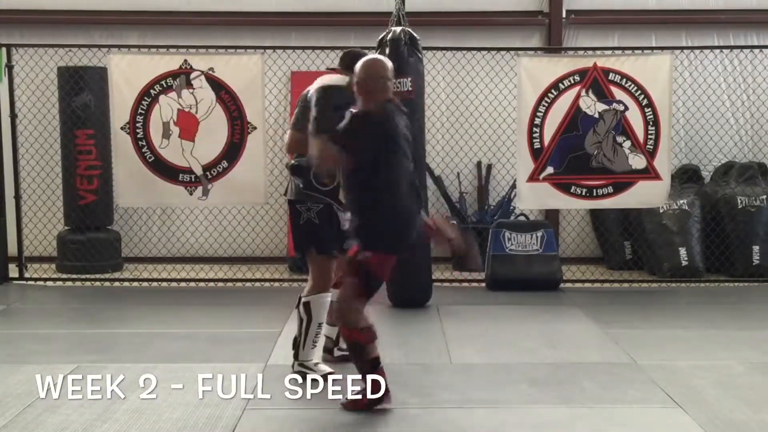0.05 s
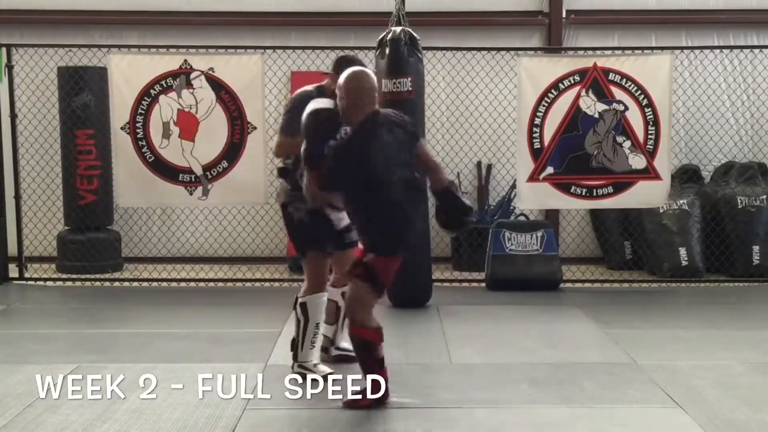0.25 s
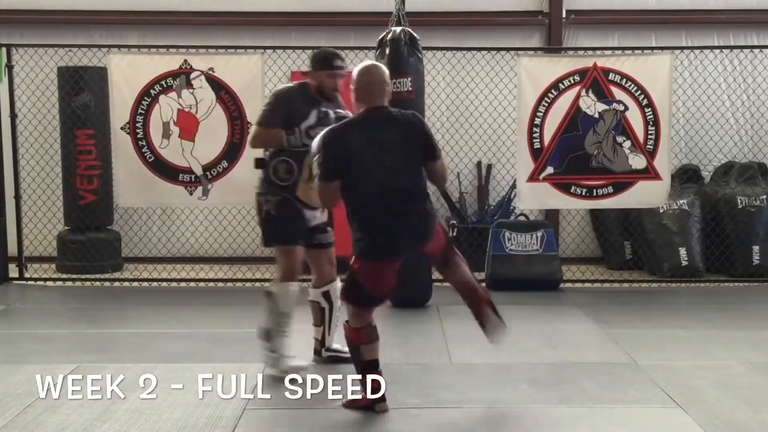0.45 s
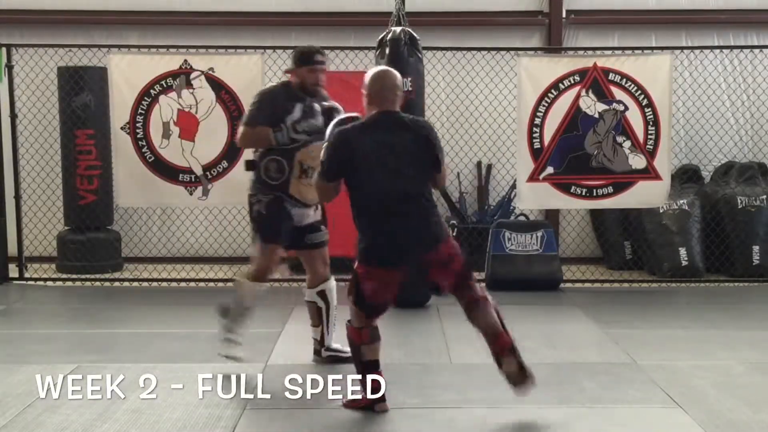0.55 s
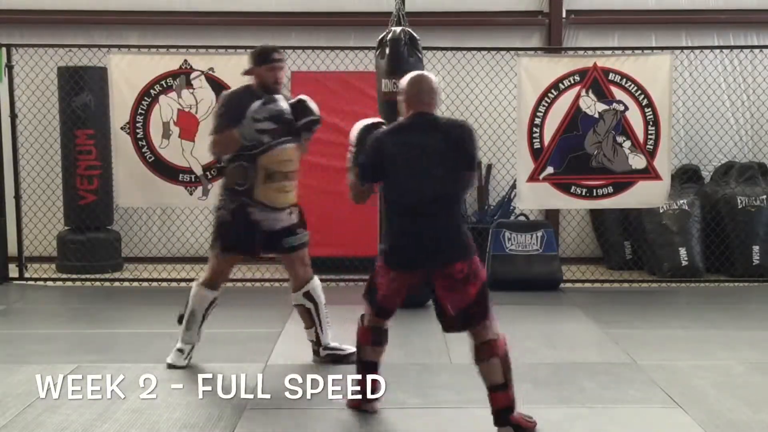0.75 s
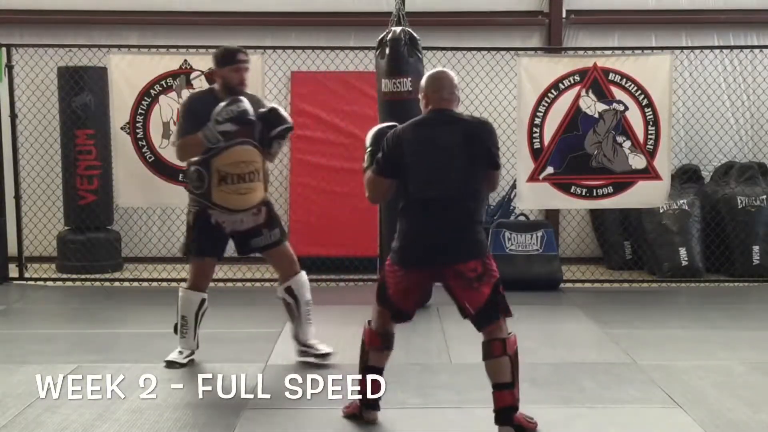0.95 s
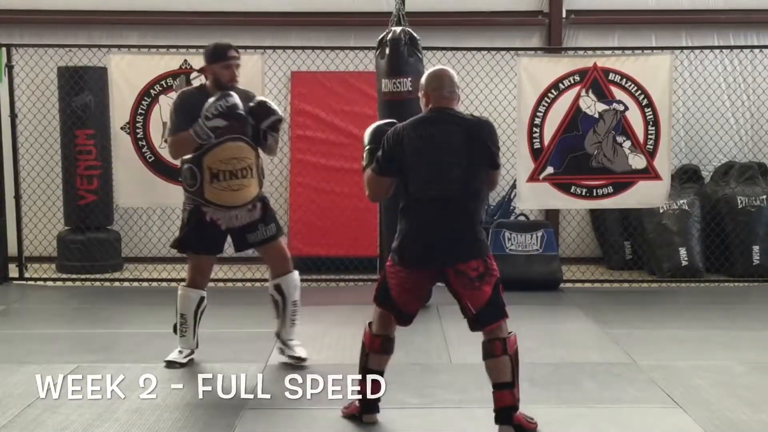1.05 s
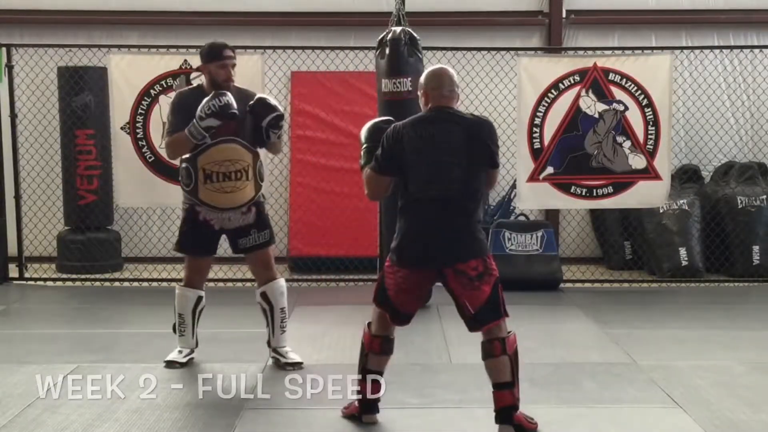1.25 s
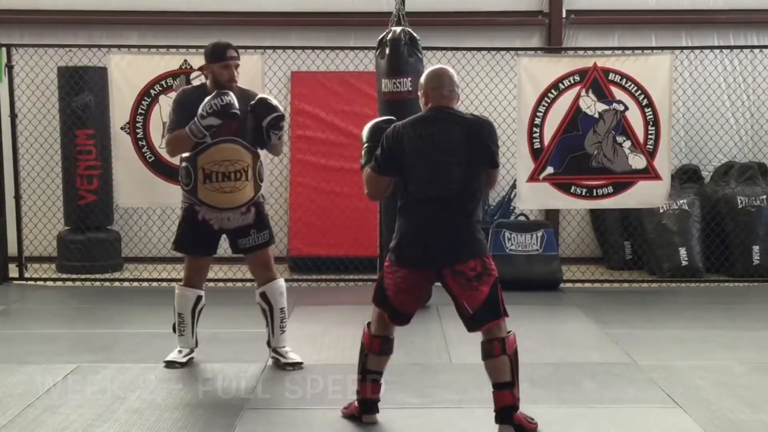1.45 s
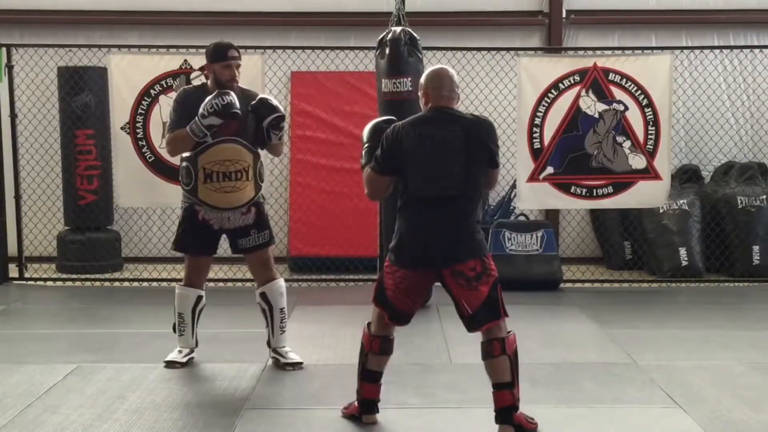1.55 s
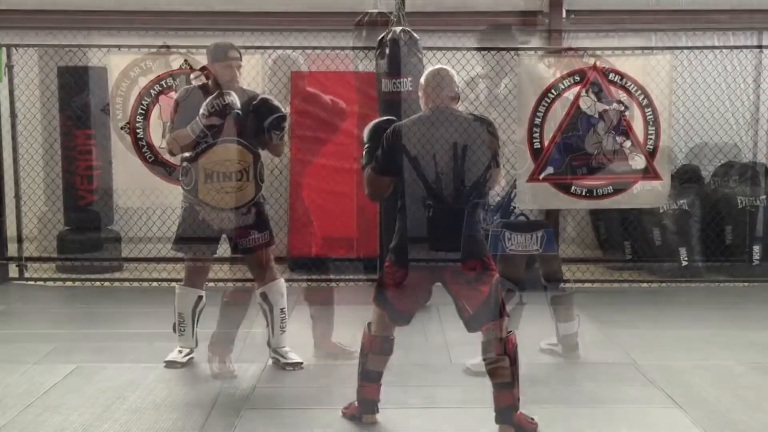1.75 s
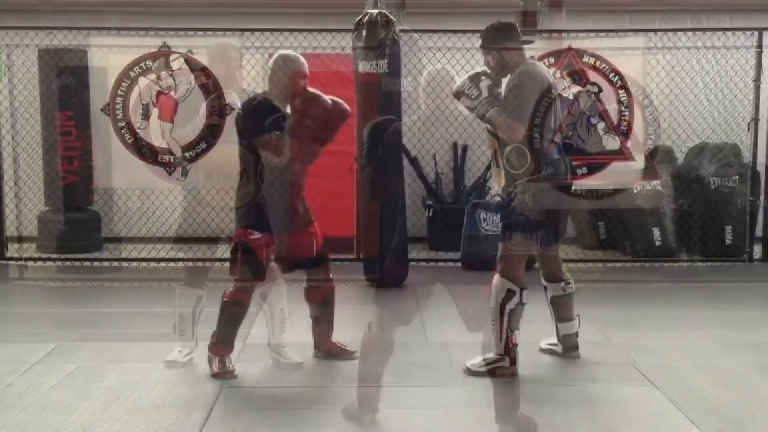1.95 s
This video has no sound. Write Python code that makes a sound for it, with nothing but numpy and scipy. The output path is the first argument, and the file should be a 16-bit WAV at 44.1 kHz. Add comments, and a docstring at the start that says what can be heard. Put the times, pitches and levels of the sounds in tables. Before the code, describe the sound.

One hard kick hits a strike pad, a leathery smack over a heavy thud that rings out in a big training hall. A light metallic rattle swells and fades, followed by quiet footsteps on mats.

```python
"""Feet shuffle on mats over the low rumble of a large gym. A kick lands on a padded body shield:
a light brush, then a smack of leather and trapped air and a deep thud of padding and body.
Floor and walls reflect the blow, the hall reverberates, and a fine metallic rattle, likely a wire
fence, swells and fades. The fighters' gear knocks and ticks, and a sole squeaks once by stick-slip."""
import sys
import numpy as np
from scipy import signal
from scipy.fft import rfft, irfft, next_fast_len
from scipy.io import wavfile
from scipy.ndimage import map_coordinates

SR = 44100
rng = np.random.default_rng(int(sys.argv[2]) if len(sys.argv) > 2 else 0)


def materialize(psi):
    """Save the field psi as 16-bit PCM at rate SR to the path in sys.argv[1].

    A 1-D psi becomes a single channel; in a 2-D psi each row is a channel.
    """
    bounded = np.clip(np.atleast_2d(psi).T, -1, 1)
    quanta = np.round(bounded * 32767).astype(np.int16)
    wavfile.write(sys.argv[1], SR, quanta)


N = 88200
T = np.arange(N) / SR

# Contacts with the shield. Each row: start in seconds, smack level in dB, thud level in dB,
# gain of the room's answer to the smack in dB.
CONTACTS = [(0.2213, -19.5, -29.5, -4.5), (0.246, -0.5, 0, 1.5)]
# Hiss of soles, cloth and straps. Each row: frequency in Hz, relative level in dB.
HISS_SPECTRUM = [(1500, -15), (4000, -12.5), (8000, -11), (10500, -6), (13000, 2.5), (15500, -8)]
REVERB_RISE_S = 0.0099


def amp(db):
    """Amplitude grows tenfold with every 20 dB."""
    return 10 ** (np.asarray(db) / 20)


def unit(x):
    """Normalisation to an rms of 1."""
    return x / np.sqrt(np.mean(x ** 2) + 1e-20)


def along(points, hz):
    """Interpolation between (Hz, value) points on a logarithmic frequency axis."""
    freqs, values = np.transpose(points)
    return np.interp(np.log(hz + 1), np.log(freqs + 1), values)


def filtered(x, response):
    """Linear filtering multiplies the spectrum by a frequency response."""
    size = next_fast_len(N + SR // 2)
    return irfft(rfft(x, size) * response(np.fft.rfftfreq(size, 1 / SR)), size)[:N]


def coloured(x, spectrum):
    """Spectral shaping by a curve of (Hz, dB) points."""
    return filtered(x, lambda hz: amp(along(spectrum, hz)))


def noise(spectrum):
    """Filtered white noise takes the filter's colour; its rms is 1."""
    return unit(coloured(rng.standard_normal(N), spectrum))


def impulses(per_s):
    """Shot noise: impulses of random size at independent moments."""
    return rng.standard_normal(N) * (rng.random(N) < per_s / SR)


def wobble(u):
    """Smooth random modulation with one knot for each unit of u."""
    return map_coordinates(rng.standard_normal(2048), [u], mode="wrap")


def delayed(x, seconds):
    """A pure time delay."""
    return np.pad(x, (max(round(seconds * SR), 0), 0))[:N]


def decay(t, t60):
    """Exponential damping: 60 dB in t60 seconds."""
    return np.exp(-np.log(1000) * t / t60)


def burst(t60, rise_s):
    """A transient's envelope: quick rise, exponential decay."""
    return decay(T, t60) * (1 - np.exp(-T / rise_s))


def pulse(peak_s, half_s):
    """A Gaussian envelope with standard deviation half_s."""
    return np.exp(-.5 * ((T - peak_s) / half_s) ** 2)


def ring(modes, rise_s):
    """A struck body sounds as a sum of damped modes, pushed inwards at first."""
    return -sum(amp(db) * np.sin(2 * np.pi * hz * T) * burst(t60, rise_s) for hz, db, t60 in modes)


def rumble():
    """Amplitude-modulated noise: the hall's bass swells unevenly, and the background sinks at the end."""
    # Each row: frequency in Hz, relative level in dB.
    spectrum = [(15, -55.5), (25, -26.5), (49, -0.5), (103, -0.5), (125, -4), (264, -18), (301, -17.5),
                (394, -25.5), (856, -30.5), (1000, -30), (2930, -42.5), (12400, -49.5), (15000, -56)]
    level_db, fade_start_s, fade_db_per_s = -56, 1.34, 7
    swells_db = 1.2 * wobble(T * 10)
    air = noise(spectrum)
    bass = filtered(air, lambda hz: 1 / (1 + (hz / 300) ** 4))
    envelope = amp(level_db - fade_db_per_s * np.maximum(T - fade_start_s, 0))
    return (air - bass + bass * amp(swells_db)) * envelope


def shuffles():
    """Sliding friction of soles and cloth makes a fine hiss and a duller scuff over each soft footfall."""
    # Each row: peak time and half length in seconds, then hiss, scuff and footfall levels in dB.
    steps = [(0.02, .022, -59.5, -61, -50.5), (0.13, .014, -64.5, -71, -54.5),
             (0.181, 0.033, -69, -69.5, -55.5), (.221, .004, -54.5, -42, -46),
             (0.241, .005, -56, -41.5, -37.5), (0.674, 0.062, -72, -72.5, -47),
             (.749, 0.0031, -47, -62, -57), (0.869, .035, -61.5, -65, -46), (1.017, .018, -60, -70.5, -55),
             (1.098, 0.02, -90, -70, -58), (1.549, 0.12, -97.5, -83.5, -69)]
    # Each row of both spectra: frequency in Hz, relative level in dB.
    scuff_spectrum = [(150, -4), (400, -4.5), (700, -8), (1100, 2.5), (1600, -7.5), (2500, -9),
                      (5000, -20.5), (12000, -37.5)]
    footfall_spectrum = [(30, -21.5), (70, -2.5), (140, 7), (220, -6.5), (320, -9), (500, -24.5),
                         (1500, -53.5)]
    hiss, scuff, footfall = noise(HISS_SPECTRUM), noise(scuff_spectrum), noise(footfall_spectrum)
    return sum(pulse(peak_s, half_s) * (amp(hiss_db) * hiss + amp(scuff_db) * scuff + amp(db) * footfall)
               for peak_s, half_s, hiss_db, scuff_db, db in steps)


def kick():
    """Impact excitation: the leather cracks, trapped air and padding ring, and the room answers."""
    # Modes of the air under the leather (smack) and of padding and body (thud).
    # Each row: frequency in Hz, level in dB, 60 dB decay time in seconds.
    air_modes = [(948, -3.5, 0.017), (1780, -9.5, 0.0092), (2320, -16.5, 0.015)]
    padding_modes = [(65.7, -13.5, 0.52), (87, -9.5, 0.24), (105.1, -12.5, 0.41), (165.7, -16.5, 0.44),
                     (156, -11.5, 0.035), (300, -31.5, .55)]
    # The leather's crack. Each row: frequency in Hz, relative level in dB.
    crack_spectrum = [(200, -13.5), (600, -9), (1000, -0.5), (2000, -0.5), (3500, -6), (7000, -15),
                      (10000, -10), (12800, -4.5), (15500, -10)]
    thud = delayed(ring(padding_modes, rise_s=.003), seconds=.0042)
    out = np.zeros(N)
    for start_s, smack_db, thud_db, room_db in CONTACTS:
        crack = amp(-10.5) * noise(crack_spectrum) * burst(t60=0.021, rise_s=0.0009)
        smack = ring(air_modes, rise_s=0.00024) + crack
        room = amp(room_db) * (early_reflections(smack) + hall_reverberation())
        out += delayed(amp(smack_db) * (smack + room) + amp(thud_db) * thud, start_s)
    return out


def gear():
    """Heavily damped modes make shin guards and feet knock dully; straps tick in tiny noise bursts."""
    # Each row of both tables: start in seconds, level in dB.
    knocks = [(.2250, -28), (0.75, -50.5), (.885, -53)]
    ticks = [(1.216, -63.5), (1.332, -68.5)]
    # Each row: frequency in Hz, level in dB, 60 dB decay time in seconds.
    knock_modes = [(215, 4, 0.061), (361, -4.5, 0.11), (680, 2, 0.021), (1030, -5, 0.0084)]
    knock = ring(knock_modes, rise_s=0.0011)
    tick_envelope = burst(t60=0.023, rise_s=.0003)
    knocking = sum(delayed(amp(db) * knock, s) for s, db in knocks)
    ticking = sum(delayed(amp(db) * noise(HISS_SPECTRUM) * tick_envelope, s) for s, db in ticks)
    return knocking + ticking


def early_reflections(smack):
    """Specular reflection: floor and walls return delayed, brighter copies of the smack."""
    # Each row: delay in seconds, gain in dB.
    paths = [(.0093, -11.5), (.0124, -11.5), (.0153, -6), (.0180, -11), (.0195, -9.5), (.027, -17),
             (.0385, -9), (.043, -15)]
    # Each row: frequency in Hz, gain in dB.
    wall_response = [(300, -10), (1000, -7), (2500, -2.5), (6000, 4.5), (13000, 1)]
    return coloured(sum(amp(db) * delayed(smack, lag) for lag, db in paths), wall_response)


def hall_reverberation():
    """A blow's diffuse field: scatter from close walls, then a tail whose decay depends on frequency."""
    # Each row of both spectra: frequency in Hz, relative level in dB.
    tail_spectrum = [(25, -24.5), (45, -2), (70, 13), (160, 16), (280, 1), (380, 0.5), (500, -9.5),
                     (1050, 1.5), (1600, -5.5), (2600, -2.5), (4500, -6), (7500, -10.5), (10000, -9.5),
                     (12700, 1), (14300, -9.5), (15500, -24.5)]
    scatter_spectrum = [(40, -22.5), (100, 0.5), (250, 5.5), (500, -8), (1000, 3), (2500, -2), (7000, -13),
                        (12700, -3), (14300, -5.5), (15500, -18)]
    # Each row: frequency in Hz, 60 dB decay time in seconds.
    reverberation_times = [(60, 1), (150, 1), (400, .64), (1000, 0.54), (2500, 0.94), (5000, 0.99),
                           (9000, 1), (13000, 0.64)]
    boom_hz, boom_rise_s = 251.8, 0.017  # the bass builds up more slowly
    hz, t, bands = signal.stft(noise(tail_spectrum), SR, nperseg=512)
    build_up = 1 - np.exp(-t / boom_rise_s) / (1 + (hz[:, None] / boom_hz) ** 4)
    damping = decay(t, along(reverberation_times, hz)[:, None])
    tail = signal.istft(bands * build_up * damping, SR, nperseg=512)[1][:N]
    scatter = unit(coloured(impulses(per_s=2500), scatter_spectrum)) * decay(T, t60=.22)
    onset = 1 - np.exp(-T / REVERB_RISE_S)
    return delayed((amp(-21) * tail + amp(-16.5) * scatter) * onset, seconds=.011)


def fence_rattle():
    """Countless tiny contacts excite wire resonances, building up after the blow and dying away."""
    # Each row: frequency in Hz, relative level in dB.
    wire_spectrum = [(900, -34), (1900, -10.5), (2900, -11.5), (3300, -0.5), (3700, -7), (5000, -4.5),
                     (6050, 1), (7000, -4), (7900, -14), (11000, -17.5), (14000, -29)]
    peak_s, peak_db, rise_s, fall_db_per_s = 0.55, -37.5, .11, 68
    level_db = peak_db - fall_db_per_s * np.maximum(T - peak_s, 0)
    swell = np.where(T < peak_s, pulse(peak_s, rise_s), 1) * (T > CONTACTS[-1][0])
    # Random ripple on the spectrum stands for the many uneven resonances.
    wires = lambda hz: amp(along(wire_spectrum, hz) + 2.5 * wobble(hz / 30))
    return amp(level_db) * swell * unit(filtered(impulses(per_s=9700), wires))


def squeak():
    """Stick-slip friction of a sole gives a rough tone for a few milliseconds; dull echoes follow."""
    # Each entry: level of a harmonic in dB, from the fundamental up.
    harmonics_db = [0, -8.5, -11.5]
    # Each row: delay in seconds, gain in dB.
    echoes = [(.021, -7), (0.031, -14), (.047, -7), (.056, -14), (.066, -23)]
    pitch_hz, roughness_rad = 1275, .28
    phase = 2 * np.pi * pitch_hz * T + roughness_rad * wobble(T * 900)
    tone = sum(amp(db) * np.sin(k * phase) for k, db in enumerate(harmonics_db, 1))
    chirp = amp(-50.5) * tone * pulse(peak_s=1.0745, half_s=0.0023)
    dull = filtered(chirp, lambda hz: 1 / (1 + (hz / 2000) ** 4))
    return chirp + sum(amp(db) * delayed(dull, lag) for lag, db in echoes)


def scene():
    """Superposition of all sources; the small sounds reverberate by convolution with decaying noise."""
    small_sounds = shuffles() + gear() + squeak()
    response = rng.standard_normal(N) * burst(t60=.6, rise_s=REVERB_RISE_S)
    reverb = signal.fftconvolve(small_sounds, response / np.linalg.norm(response))[:N]
    return (kick() + fence_rattle() + small_sounds + amp(-5.5) * reverb + rumble())[None]


def record(dry):
    """Band limiting thins the deepest bass and removes the highest treble."""
    low_cut_hz, top_hz = 37, 15700
    high_pass = signal.butter(3, low_cut_hz, "highpass", fs=SR, output="sos")
    return filtered(signal.sosfilt(high_pass, dry[0]), lambda hz: hz < top_hz)[None]


dry = scene()
out = record(dry)
materialize(out)
```